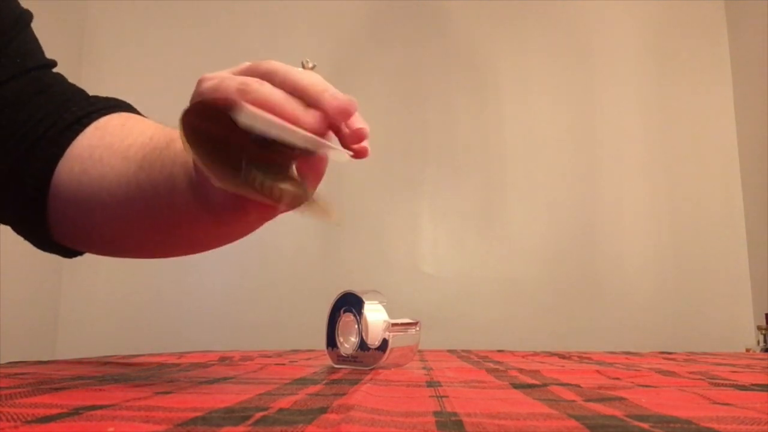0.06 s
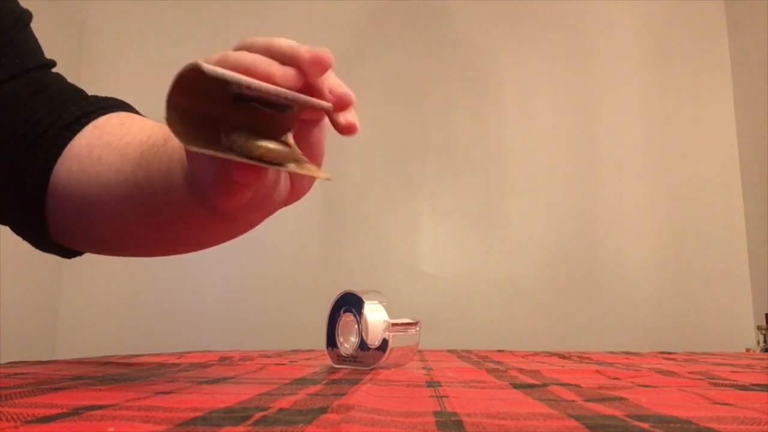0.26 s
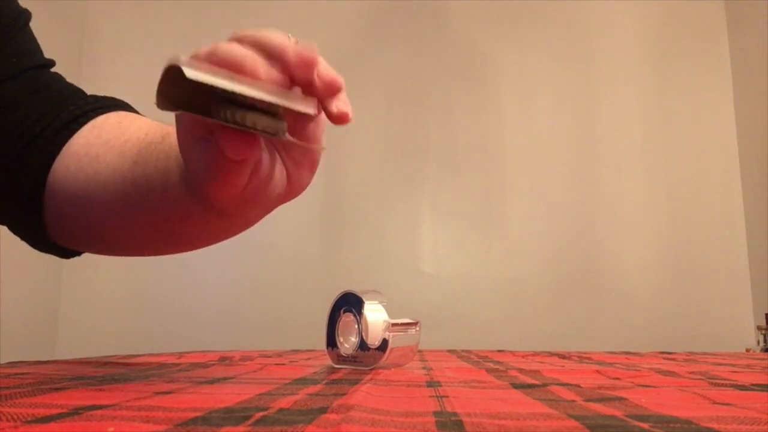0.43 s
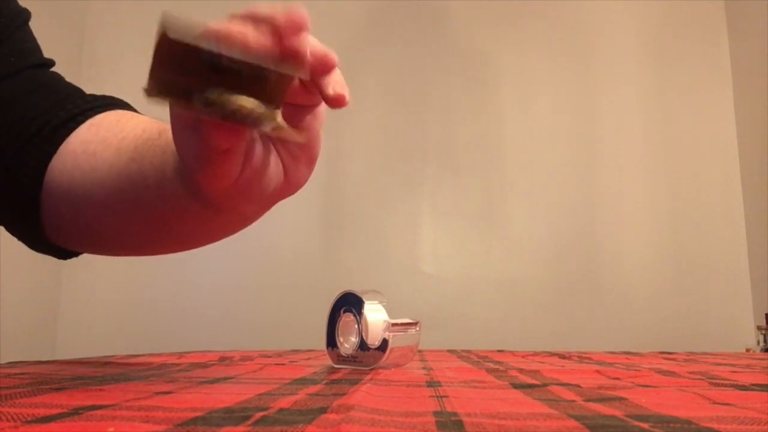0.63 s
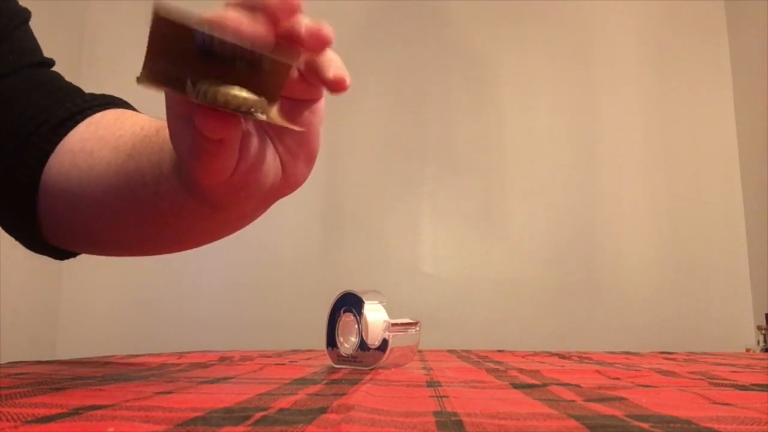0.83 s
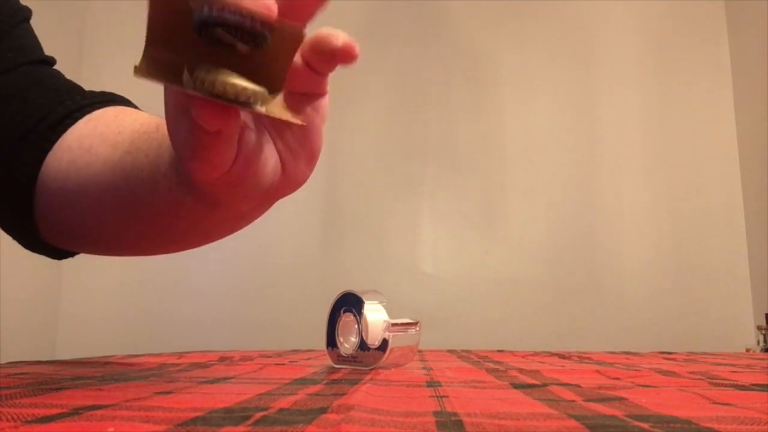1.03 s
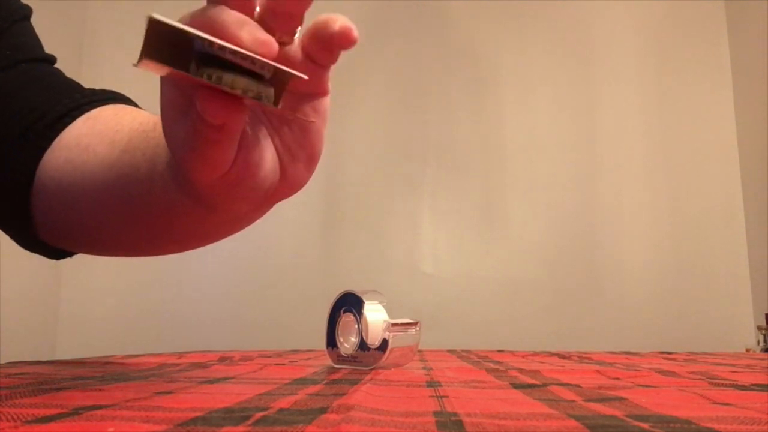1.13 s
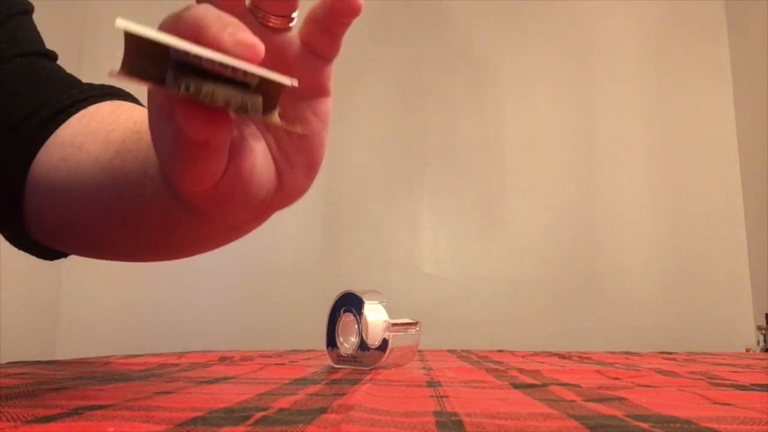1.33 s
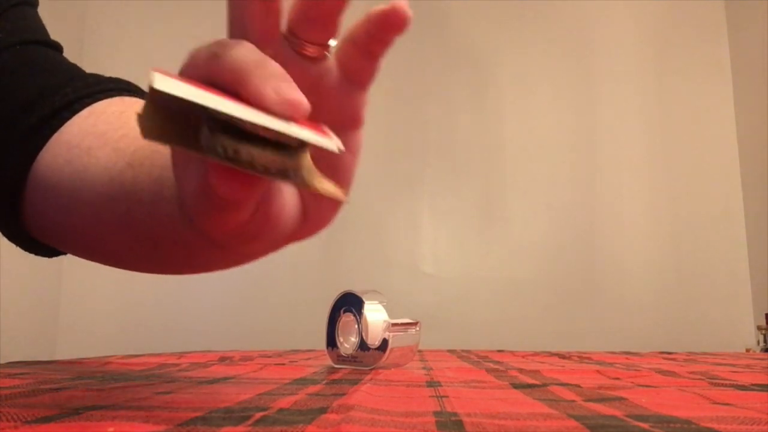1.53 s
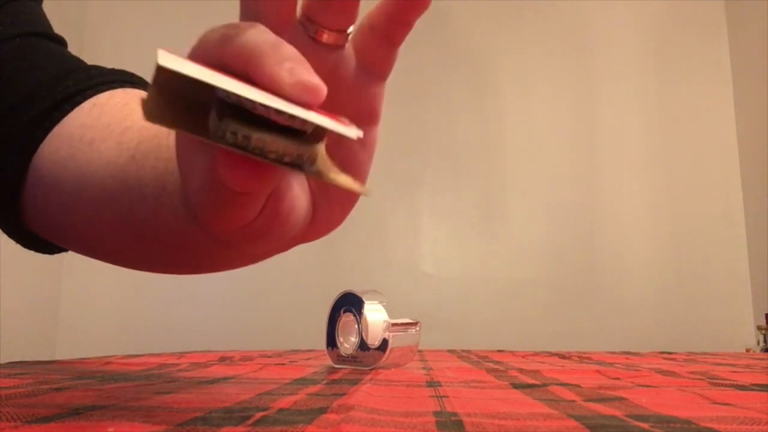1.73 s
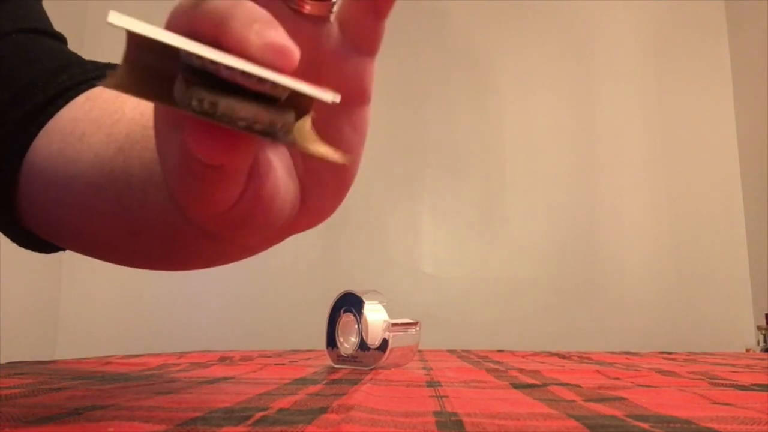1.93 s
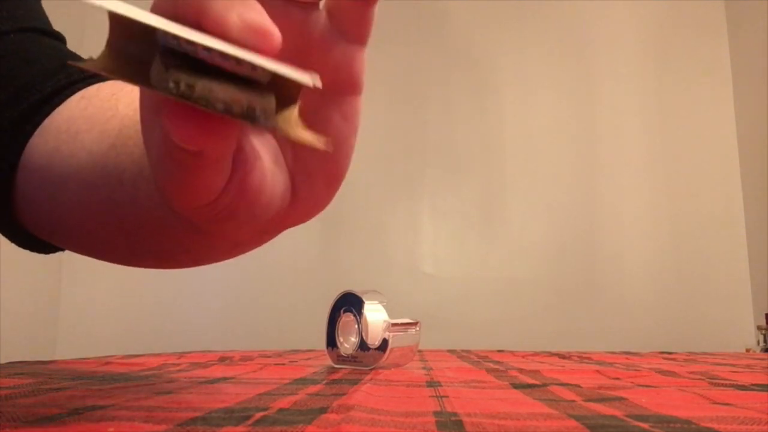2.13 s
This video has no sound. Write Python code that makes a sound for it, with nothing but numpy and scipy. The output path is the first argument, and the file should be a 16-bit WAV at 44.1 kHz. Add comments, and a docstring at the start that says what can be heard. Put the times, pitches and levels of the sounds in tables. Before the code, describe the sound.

A handmade cardboard castanet with metal caps clacks sharply ten times in a small quiet room

```python
"""A folded cardboard castanet with two metal caps is snapped shut ten times above a table in a small room.
At first a faint room ring, three narrow noise bands, decays while a low hum grows in the noise of room air.
At each snap the caps clash and chatter, exciting decaying modes and a noise crack; from the second snap on,
the fingers first pat the card, a swelling low tone behind a noise tick. In the later part, noise bursts tick
as the card springs open. Echoes from table and walls and a diffuse tail answer."""
import sys
import numpy as np
from scipy import signal
from scipy.fft import rfft, irfft
from scipy.io import wavfile

SR = 44100
rng = np.random.default_rng(int(sys.argv[2]) if len(sys.argv) > 2 else 0)


def store_wav(level_fs):
    """Save 16-bit WAV to argv[1]."""
    pcm = np.round(np.clip(np.atleast_2d(level_fs), -1, 1) * 32767)
    wavfile.write(sys.argv[1], SR, pcm.T.astype(np.int16))


N = 95961
T = np.arange(N) / SR
HIT_T = T[:4096]  # time axis of one snap, pat or tick

# Steady noise of the room air. Each row: frequency in Hz, relative level in dB.
AIR_SPECTRUM = [(20, -15), (35, 0.5), (70, 0.5), (180, -4), (330, 1), (500, -5), (680, 7.5), (1150, -12.5),
                (2500, -7.5), (3400, -16.5), (4400, -18), (10000, -27.5), (13000, -26.5), (16000, -70)]
AIR_DB = -71.5
# Low wavering hum. Each row: frequency in Hz, full level in dB.
HUM_TONES = [(67, -81.5), (99, -77)]
HUM_WIDTH_HZ, HUM_START_DB, HUM_FULL_S = 13, -32, 0.9
# Room resonances decaying from the start. Each row: frequency in Hz, starting level in dB.
EARLY_RESONANCES = [(390, -68.5), (700, -63.5), (775, -62)]
EARLY_WIDTH_HZ, EARLY_T60_S = 40, 0.54

# Spectrum of the diffuse tail. Each row: frequency in Hz, relative level in dB.
TAIL_SPECTRUM = [(200, -10.5), (480, -11), (720, 2.5), (1150, -14), (1700, -15), (2600, -8.5), (3400, -14),
                 (3900, -16), (4500, -8.5), (5400, -15.5), (6800, -15), (7500, -15.5), (10000, -18),
                 (11800, -23.5), (14500, -17)]
# Reverberation of the tail. Each row: frequency in Hz, 60 dB decay time in seconds.
TAIL_T60 = [(200, 0.2), (800, 0.18), (2500, 0.45), (5000, 0.42), (12000, 0.32)]
# Reflections from table and walls. Each row: delay in seconds, level in dB.
REFLECTIONS = [(.0055, -16), (.0185, -26.5), (.0215, -26.5), (0.047, -26.5)]
TAIL_RISE_S, ECHO_CUT_HZ = 0.012, 4100

# Fingers landing on the card. Each row: start in seconds, thud level in dB before PAT_DB,
# thud frequency in Hz, tick level in dB before PAT_TICK_DB.
FINGER_PATS = [(0.3616, -58.5, 348, -51.5), (.572, -54.5, 350, -49), (.749, -50.5, 360, -47.5),
               (.925, -53, 492, -56), (1.1261, -50.5, 445, -50.5), (1.3356, -51.5, 475, -50.5),
               (1.526, -48, 461, -50), (1.7498, -52, 482, -51.5), (1.9679, -53.5, 474, -58)]
# Tick of the landing fingers. Each row: frequency in Hz, relative level in dB.
PAT_TICK_SPECTRUM = [(100, -28), (400, -17), (800, 12.5), (1200, -17), (2600, 10.5), (3400, -9),
                     (5000, -23), (8000, -18), (12000, -14), (16000, -39)]
PAT_DB, PAT_TICK_DB = -0.5, -3
PAT_RISE_S, PAT_LAG_S = 0.0012, 0.0025  # the thud follows the tick by the lag
PAT_KNOCK_DB, PAT_KNOCK_HZ = -13.5, 588  # second tone, relative to the thud

# Card and caps ticking on opening. Each row: start in seconds, body level in dB,
# treble level in dB, both before TICK_DB.
OPENING_TICKS = [(1.279, -66, -66), (1.470, -59.5, -57), (1.6919, -61, -55), (1.829, -57.5, -59.5),
                 (1.9139, -62.5, -68), (1.9427, -74, -53), (2.012, -65, -53), (2.0334, -83, -42.5),
                 (2.1137, -58, -56.5), (2.169, -68, -68)]
# Body of an opening tick. Each row: frequency in Hz, relative level in dB.
TICK_BODY_SPECTRUM = [(60, -58), (300, -11.5), (800, -8.5), (1200, -21), (2600, 3.5), (3400, -25),
                      (4500, -4), (8000, -24.5), (16000, -45)]
# Treble of an opening tick. Each row: frequency in Hz, relative level in dB.
TICK_TREBLE_SPECTRUM = [(200, -45), (2000, -14), (5000, -11), (6800, -8), (8000, -8), (10000, -7),
                        (11800, 0), (14000, -10), (16000, -18)]
TICK_DB, TICK_T60_S, TICK_TREBLE_T60_S = 5, 0.024, 0.005

# The caps clashing. Each row: start in seconds, card knock level in dB, card clack level in dB,
# cap ring level in dB, cap zing level in dB, knock frequency in Hz, cap note level in dB,
# note frequency in Hz, cap overtone level in dB, overtone frequency in Hz, delay of the second contact
# in seconds, its strength in dB re the first, change of the treble sent into the room in dB.
# The sound levels are relative: the part's own gain and SNAP_DB are added.
CLASHES = [(0.1662, -50.5, -41.5, -39.5, -43.5, 896, -36.5, 2373, -48, 3850, .0012, -2, 4.5),
           (.3866, -49, -30, -37, -43.5, 745, -34, 2623, -37, 3870, 0.0013, -4, 1.5),
           (0.5933, -56.5, -35, -44, -48, 780, -37.5, 2476, -54, 3850, .0029, 0.5, 2),
           (0.7901, -52.5, -38, -50, -50.5, 593, -44, 2672, -48.5, 4690, 0.0045, -5, 3.5),
           (.9723, -58.5, -41, -46.5, -44, 634, -41.5, 2423, -46, 4790, .0031, 2, 1),
           (1.1532, -50, -35, -39, -33.5, 600, -38.5, 2696, -39.5, 4450, .0024, -0.5, 1.5),
           (1.364, -50, -39, -44.5, -33.5, 820, -39, 2550, -40, 4430, .0036, -4, -2),
           (1.5726, -51.5, -40.5, -46.5, -41, 716, -41.5, 2666, -44.5, 4416, 0.0026, 1, -4.5),
           (1.7823, -51, -42.5, -42.5, -32.5, 785, -35, 2484, -39.5, 4300, .0036, -4, -4.5),
           (1.9819, -50.5, -37, -41.5, -39.5, 795, -29, 2603, -48, 4370, .0028, 1.5, -11)]
# Centres of the knock, clack, ring and zing registers. Each entry: frequency in Hz.
REGISTER_CENTRES = [800, 1900, 5000, 11500]
# Modes of card and caps. Each row: frequency in Hz before detuning, relative level in dB,
# 60 dB decay time in seconds.
CARD_AND_CAP_MODES = [(975, -6.5, 0.021), (1370, -14.5, 0.042), (1727, -4.5, 0.015), (2225, -2.5, 0.011),
                      (3905, -5.5, 0.025), (5665, -5, 0.012), (6933, 0.5, 0.0084), (9180, -11, 0.015),
                      (11500, 2.5, 0.011), (12080, -4.5, 0.0094), (13400, -6, .005)]
# Broad crack of a contact. Each row: frequency in Hz, relative level in dB.
CRACK_SPECTRUM = [(50, -22), (200, -12), (380, -2), (520, 12), (1000, -4), (2300, -2.5), (2900, 2),
                  (3300, -6), (3800, -5), (5000, -5), (10000, -12), (13000, -11), (16000, -32)]
SNAP_DB, SNAP_LOW_CUT_HZ = 5, 228
GRIP_DETUNE = 0.01  # standard deviation, as a fraction of the mode frequency
CONTACT_RISE_S = 0.00014
CHATTER_DB, CHATTER_PER_S, CHATTER_T60_S = -19, 1900, 0.036
CRACK_DB, CRACK_T60_S = 3.5, 0.012
KNOCK_DB, KNOCK_T60_S = -2, 0.03  # the card's lowest note, set by the grip
NOTE_DB, NOTE_T60_S = -0.5, 0.021  # the caps' main note
SECOND_CAP_DB, SECOND_CAP_ABOVE_HZ = -7, 200  # the two caps are not quite in tune
OVERTONE_DB, OVERTONE_T60_S = -1, 0.017
THROW_ABOVE_HZ = 3100  # the caps beam their treble, so their angle sets how much reaches the walls

CUTOFF_HZ = 16300


def amp(db):
    """Logarithmic level: 20 dB is a tenfold amplitude gain."""
    return 10 ** (np.asarray(db) / 20)


def rms_one(x):
    """Normalisation: scale a signal to unit rms."""
    return x / np.sqrt(np.mean(x ** 2) + 1e-20)


def at_hz(points, hz):
    """Interpolation of a table on a logarithmic frequency axis."""
    f, v = np.transpose(points)
    return np.interp(np.log(np.maximum(hz, 1)), np.log(f), v)


def dying(t, t60):
    """Exponential damping: amplitude falls by 60 dB in t60 seconds."""
    return np.exp(-np.log(1000) * t / t60)


def tint(x, points):
    """Spectral shaping: weight each frequency by a table of levels."""
    f = np.fft.rfftfreq(len(x), 1 / SR)
    return irfft(rfft(x) * amp(at_hz(points, f)), len(x))


def noise(points, size):
    """Coloured noise: white noise given a spectrum and unit rms."""
    return rms_one(tint(rng.standard_normal(size), points))


def narrow(hz, width_hz):
    """Narrow-band noise: a resonance makes noise a wavering tone of unit rms."""
    f = np.fft.rfftfreq(N, 1 / SR)
    resonance = 1 / (1 + (2 * (f - hz) / width_hz) ** 2)
    return rms_one(irfft(rfft(rng.standard_normal(N)) * resonance, N))


def add(out, s, x):
    """Superposition: mix x into out from time s in seconds."""
    i = int(np.clip(s * SR, 0, len(out) - 1))
    out[i:i + len(x)] += x[:len(out) - i]


def background():
    """Stationary noise of room air, with narrow-band hum that grows and resonances that decay."""
    hum = sum(amp(db) * narrow(hz, HUM_WIDTH_HZ) for hz, db in HUM_TONES)
    hum = hum * amp(HUM_START_DB * np.clip(1 - T / HUM_FULL_S, 0, 1))
    early = sum(amp(db) * narrow(hz, EARLY_WIDTH_HZ) for hz, db in EARLY_RESONANCES)
    return amp(AIR_DB) * noise(AIR_SPECTRUM, N) + hum + early * dying(T, EARLY_T60_S)


def room(x):
    """Convolution with an impulse response: dull reflections and a tail damped band by band."""
    t = T[:SR]
    f = np.fft.rfftfreq(SR, 1 / SR)
    diffuse = rfft(tint(rng.standard_normal(SR), TAIL_SPECTRUM))
    response = np.zeros(SR)
    edges = np.geomspace(60, 18000, 13)
    for low, high in zip(edges, edges[1:]):
        band = irfft(diffuse * ((f >= low) & (f < high)), SR)
        fade = dying(t, at_hz(TAIL_T60, np.sqrt(low * high))) * np.clip(t / TAIL_RISE_S, 0, 1)
        response += band * fade / np.linalg.norm(fade)  # equal energy whatever the decay time
    low_pass = signal.butter(1, ECHO_CUT_HZ, fs=SR)
    echo = signal.lfilter(*low_pass, signal.unit_impulse(64))
    for s, db in REFLECTIONS:
        add(response, s, amp(db) * echo)
    return signal.fftconvolve(x, response)[:N]


def tick(spectrum, t60):
    """Impulsive friction: a tiny dry rub of card or cap as damped coloured noise."""
    rise = 1 - np.exp(-HIT_T / CONTACT_RISE_S)
    return noise(spectrum, len(HIT_T)) * dying(HIT_T, t60) * rise


def finger_pats():
    """Soft impact: a noise tick, then two low tones that swell and die with the yielding card."""
    out = np.zeros(N)
    swell = HIT_T / PAT_RISE_S * np.exp(1 - HIT_T / PAT_RISE_S)
    knock = amp(PAT_KNOCK_DB) * np.sin(2 * np.pi * PAT_KNOCK_HZ * HIT_T)
    for s, db, hz, tick_db in FINGER_PATS:
        thud = np.sin(2 * np.pi * hz * HIT_T) + knock
        add(out, s, amp(tick_db + PAT_TICK_DB) * tick(PAT_TICK_SPECTRUM, TICK_T60_S))
        add(out, s + PAT_LAG_S, amp(db + PAT_DB) * swell * thud)
    return out


def opening_ticks():
    """Frequency-dependent damping: the treble of each opening tick dies sooner than its body."""
    out = np.zeros(N)
    for s, body_db, treble_db in OPENING_TICKS:
        body = amp(body_db) * tick(TICK_BODY_SPECTRUM, TICK_T60_S)
        treble = amp(treble_db) * tick(TICK_TREBLE_SPECTRUM, TICK_TREBLE_T60_S)
        add(out, s, amp(TICK_DB) * (body + treble))
    return out


def snap(colour, notes, again_s, again_db):
    """Modal excitation: two contacts and a dying chatter drive damped modes; each contact also cracks."""
    size = len(HIT_T)
    contacts = np.zeros(size)
    add(contacts, 0, np.ones(1))
    add(contacts, again_s, amp([again_db]))
    contacts /= np.linalg.norm(contacts)
    chatter = (rng.random(size) < CHATTER_PER_S / SR) * dying(HIT_T, CHATTER_T60_S)
    rise = 1 - np.exp(-HIT_T / CONTACT_RISE_S)

    modes = []
    for hz, db, t60 in CARD_AND_CAP_MODES:
        detuned_hz = hz * (1 + GRIP_DETUNE * rng.normal())
        modes.append((detuned_hz, db + at_hz(colour, hz), t60))

    out = np.zeros(size)
    for hz, db, t60 in modes + notes:
        force = contacts * rng.choice([-1, 1], size)
        force = force + amp(CHATTER_DB) * chatter * rng.standard_normal(size)
        mode = np.sin(2 * np.pi * hz * HIT_T) * dying(HIT_T, t60) * rise
        ringing = signal.fftconvolve(force, mode)[:size]
        out += amp(db) * rms_one(ringing) * mode.std()  # the level of a single strike

    # the energies of the two cracks add
    crack_energy = (rise * dying(HIT_T, CRACK_T60_S)) ** 2
    shape = np.sqrt(np.abs(signal.fftconvolve(contacts ** 2, crack_energy)[:size]))
    out += amp(CRACK_DB) * shape * tint(noise(CRACK_SPECTRUM, size), colour)
    high_pass = signal.butter(2, SNAP_LOW_CUT_HZ, "high", fs=SR, output="sos")
    return amp(SNAP_DB) * signal.sosfilt(high_pass, out)


def castanet():
    """Directivity: each snap yields direct sound and a copy for the room with its own treble level."""
    direct, sent = np.zeros((2, N))
    high_pass = signal.butter(1, THROW_ABOVE_HZ, "high", fs=SR)
    for (s, *levels, knock_hz, note_db, note_hz, over_db, over_hz,
         again_s, again_db, throw_db) in CLASHES:
        notes = [(knock_hz, levels[0] + KNOCK_DB, KNOCK_T60_S),
                 (note_hz, note_db + NOTE_DB, NOTE_T60_S),
                 (note_hz + SECOND_CAP_ABOVE_HZ, note_db + SECOND_CAP_DB, NOTE_T60_S),
                 (over_hz, over_db + OVERTONE_DB, OVERTONE_T60_S)]
        colour = list(zip(REGISTER_CENTRES, levels))
        hit = snap(colour, notes, again_s, again_db)
        treble = signal.lfilter(*high_pass, hit)
        add(direct, s, hit)
        add(sent, s, hit + (amp(throw_db) - 1) * treble)
    return direct, sent


def scene():
    """Superposition of castanet, hand, room response and background."""
    snaps, sent = castanet()
    hand = finger_pats() + opening_ticks()
    return (snaps + hand + room(sent + hand) + background())[None]


def record(dry):
    """Band limitation: a steep zero-phase low-pass filter removes the top."""
    return signal.sosfiltfilt(signal.butter(12, CUTOFF_HZ, fs=SR, output="sos"), dry)


dry = scene()
out = record(dry)
store_wav(out)
```